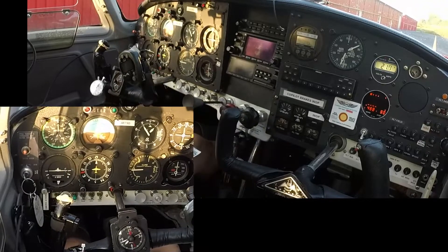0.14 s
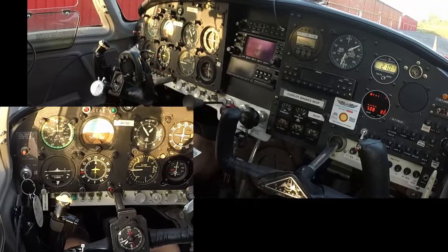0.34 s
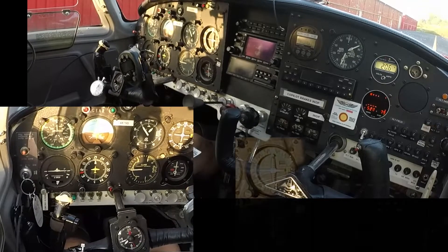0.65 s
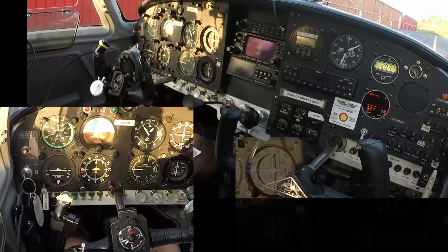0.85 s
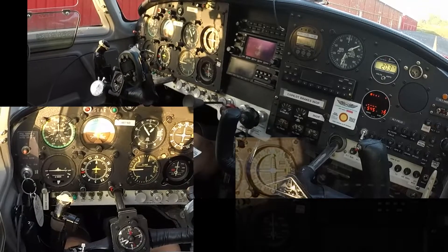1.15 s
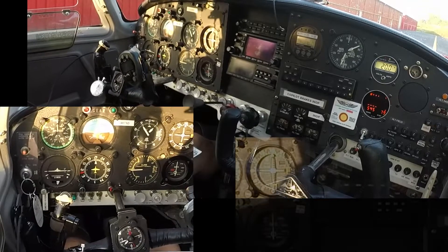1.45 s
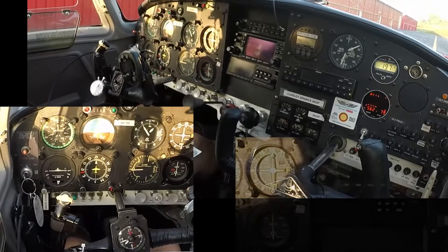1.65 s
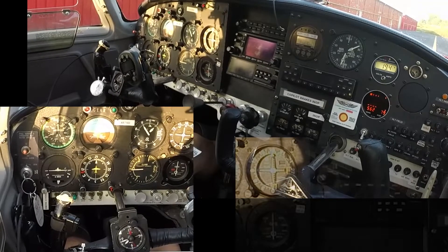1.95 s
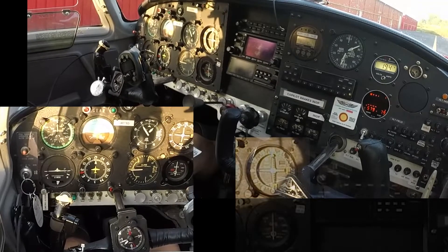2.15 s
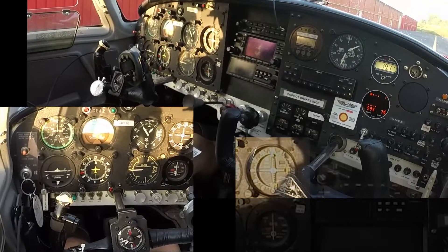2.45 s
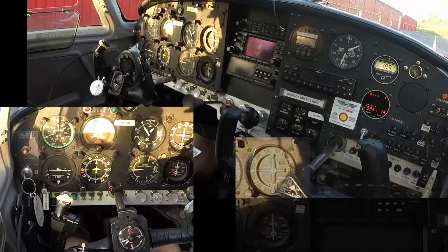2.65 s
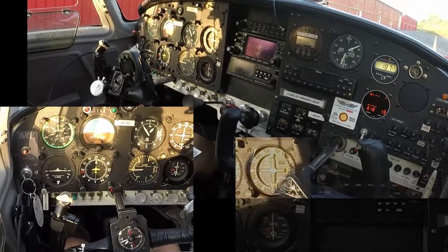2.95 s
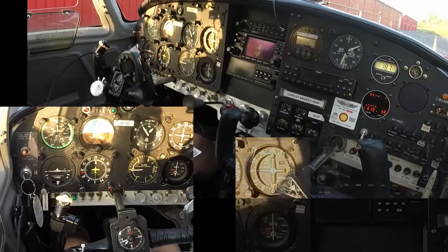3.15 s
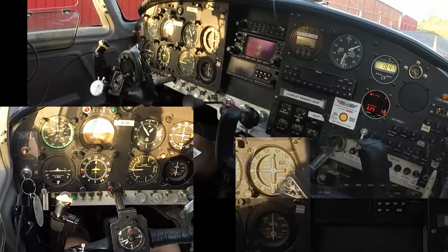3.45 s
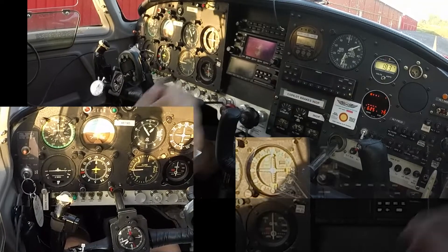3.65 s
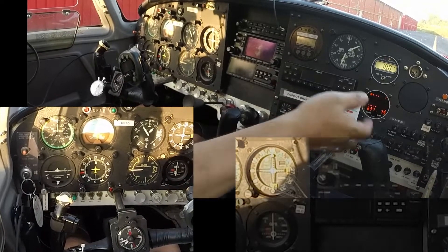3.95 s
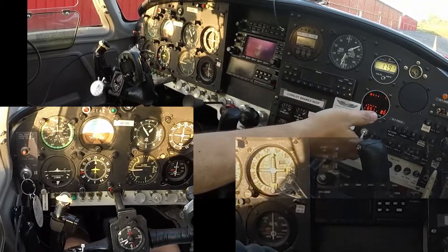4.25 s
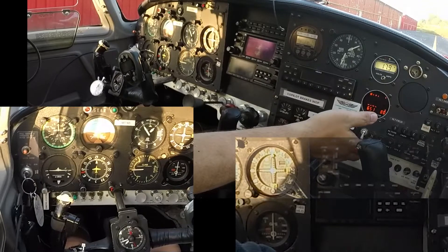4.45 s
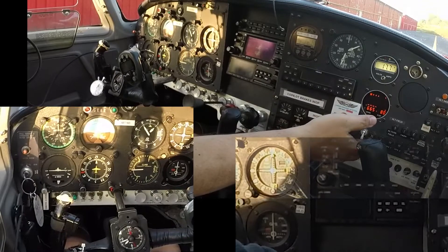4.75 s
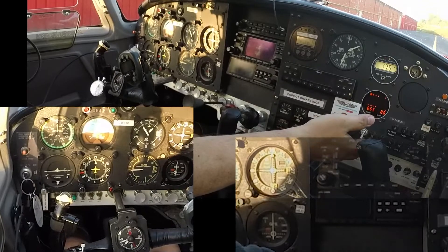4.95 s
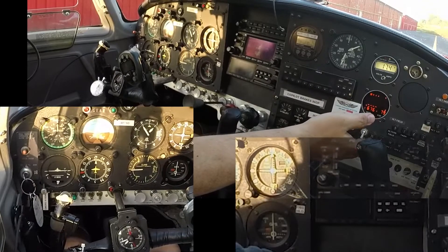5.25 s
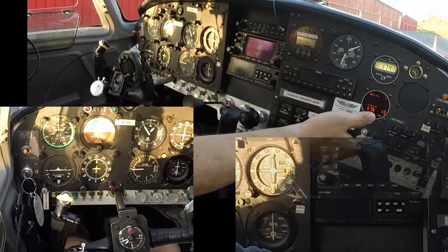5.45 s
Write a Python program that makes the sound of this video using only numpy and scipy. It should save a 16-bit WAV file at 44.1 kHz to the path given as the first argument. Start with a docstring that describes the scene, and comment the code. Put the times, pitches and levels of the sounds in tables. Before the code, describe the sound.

The whole stretch is a four-cylinder aircraft engine idling, heard from inside a closed cockpit. From 0 s a loud, even, bass-heavy throb runs without a break, about 34 pulses a second, strongest from roughly 35 to 100 Hz, with a rough low noise rumble. It rises very slightly in speed over the first second, then holds. Far quieter, muffled valve clatter and a dull panel knock repeat about eight or nine times a second. A soft, gritty propeller wash pulses on top, with hair-thin, wavering high gyro whines almost hidden. Tiny loose-metal ticks fall near 0.6, 1.3, 2.9, 3.5, 4.1 and 5.4 s. The engine and air level dips slightly near 0.8, 2.4, 2.95 and most at 4.1 s, recovering gradually. At about 5.56 s one loud, dry, thin switch pop cuts through without ringing. Mono, close cabin sound, little high end.

```python
"""Closed cockpit of an aircraft: a four-cylinder engine idles near 1030 rpm.
Firing and blade harmonics make the cabin boom over a noise rumble; filtered noise knocks give valve clatter
that repeats every two turns, and one panel knocks once a cycle. Pulsed noise is prop wash on the canopy,
wavering sines are gyro whines, short buzzing rings are loose fittings. A panel switch pops near the end.
The engine and air level dips briefly at times and creeps back."""
import sys
import numpy as np
from scipy import signal
from scipy.fft import rfft, irfft
from scipy.io import wavfile
from scipy.ndimage import uniform_filter1d

SR = 44100
rng = np.random.default_rng(int(sys.argv[2]) if len(sys.argv) > 2 else 0)


def master(y):
    """Save y as 16-bit WAV."""
    cut = np.clip(np.atleast_2d(y).T, -1, 1)
    pcm = np.round(cut * 32767)  # scale
    wavfile.write(sys.argv[1], SR, pcm.astype(np.int16))


N = 246959
T = np.arange(N) / SR

# crankshaft speed: time_s, speed_rpm
CRANK_SPEED = [(0, 1013), (1.15, 1033), (2.2, 1033), (2.5, 1030.5), (5.6, 1028.2)]
# harmonics of the firing and blade rate, first upwards: relative_level_db
FIRING_HARMONICS_DB = [-7.5, -3.5, 0, -24.5, -23.5, -21.5, -21, -38.5, -27.5, -42, -33, -36.5, -35, -39]
# engine lines picked out by panels: order (multiple of cycle rate), relative_level_db
PANEL_LINES = [(68, -35), (73, -38), (74, -35), (82, -37), (104, -44)]
# airframe shudder from uneven burning, spectrum shape: freq_hz, relative_density_db
SHUDDER_SPECTRUM = [(5, -13), (17, 2.5), (36, -2.5), (56, 2), (80, -7.5), (120, -8.5), (170, -9),
                    (215, -11), (270, -21.5), (400, -24), (600, -63)]
# eight valve seatings of one cycle: relative_strength_db
VALVE_STRENGTHS_DB = [-0.42, 1, 0.98, -1.2, 1, -0.73, 0.45, -1.2]
# firewall transmission of valve noise: freq_hz, relative_gain_db
FIREWALL_GAIN = [(150, -16.5), (290, -1), (425, 0), (465, -8), (670, -10.5), (800, -10.5), (1070, -12),
                 (1130, -20), (2000, -26), (5000, -50.5)]
# ringing panels: centre_hz, width_hz, gain_db (on the firewall output, added to it)
PANEL_RESONANCES = [(406, 30, -12), (587, 26, -1.5), (647, 45, -0.5), (896, 22, -5.5), (1034, 25, -3)]
# prop wash on the canopy, spectrum shape: freq_hz, relative_density_db
WASH_SPECTRUM = [(200, 10), (700, 11), (1300, 6), (2000, 0.5), (3100, -0.5), (4000, -5), (5200, -7),
                 (6200, -11), (7300, -10.5), (9500, -14), (12500, -21), (15000, -35)]
# level dips: start_s, depth_db (before attack and recovery shaping), recovery_s
LEVEL_DIPS = [(.77, 1.23, 1.3), (2.38, 0.9, .8), (2.95, 1.04, 1.1), (4.11, 1.7, 1.5), (4.115, 4, 0.027)]
# gyro whines: pitch_hz, level_db (rms, before trim_db)
GYRO_TONES = [(3214, -73), (3994, -81), (4188, -76), (6891, -87.5)]
# loose fittings: start_s, level_db (before trim_db and buzz), ring_hz
FITTING_TICKS = [(0.6094, -48, 4620), (1.3094, -49, 5170), (2.8988, -47, 5430), (3.4894, -55, 4070),
                 (3.5094, -49, 7270), (4.116, -41, 2500), (5.3794, -53, 4190)]
# panel switch: start_s, level_db (before pulse shaping and low cut)
SWITCH_POP = (5.56485, -6)

# layer rms in the cabin, before the level dips
BOOM_DB, SHUDDER_DB, CLATTER_DB, WASH_DB = -16, -27.5, -39.5, -46.5
# shaft imbalance, once a turn, relative to the firing harmonics
SHAFT_DB = -13.5
# weak lines of unequal cylinders: level referred to the firing rate, and slope
UNEVEN_DB, UNEVEN_DB_PER_OCTAVE = -21, -4
START_CYCLE = 0.017
FIRINGS_PER_CYCLE, TURNS_PER_CYCLE = 4, 2
DIP_ATTACK_S = 0.015
TOP_HZ = 15000


def undb(db):
    """Decibels to amplitude gain."""
    return 10 ** (np.asarray(db) / 20)


def unit(x):
    """Scale to rms 1."""
    return x / np.sqrt(np.mean(x ** 2))


def walk(rate_hz):
    """Random levels held 1 / rate_hz, smoothed twice over that span; rms 1."""
    hold = max(int(SR / rate_hz), 1)
    held = rng.standard_normal(N)[np.arange(N) // hold]
    smoothed = uniform_filter1d(held, hold)
    return unit(uniform_filter1d(smoothed, hold))


def colour(x, points):
    """Minimum-phase filter through (freq_hz, gain_db) points, interpolated over log frequency."""
    point_hz, point_db = np.transpose(points)
    size = 2 ** 18
    freq_hz = np.maximum(np.fft.rfftfreq(size, 1 / SR), 1)
    gain_db = np.interp(np.log(freq_hz), np.log(point_hz), point_db)
    # folding the cepstrum makes the filter causal
    cepstrum = irfft(np.log(undb(gain_db)))
    cepstrum[1:size // 2] *= 2
    cepstrum[size // 2 + 1:] = 0
    response = np.exp(rfft(cepstrum))
    return irfft(rfft(x, size) * response)[:N]


def resonate(x, centre_hz, width_hz):
    """One resonance, gain 1 at its centre."""
    b, a = signal.iirpeak(centre_hz, centre_hz / width_hz, fs=SR)
    return signal.lfilter(b, a, x)


def engine_lines(order_limit=32):
    """Rows order, relative_level_db; order is the multiple of the four-stroke cycle rate."""
    firing = [(FIRINGS_PER_CYCLE * (k + 1), db) for k, db in enumerate(FIRING_HARMONICS_DB)]
    between = [k for k in range(5, order_limit) if k % FIRINGS_PER_CYCLE]
    octaves = np.log2(np.array(between) / FIRINGS_PER_CYCLE)
    uneven = zip(between, UNEVEN_DB + UNEVEN_DB_PER_OCTAVE * octaves)
    return [(TURNS_PER_CYCLE, SHAFT_DB), *firing, *uneven, *PANEL_LINES]


def boom(cycle, cabin_hz=86, cabin_width_hz=12, waver_db=0.7, upper_waver_db=1.5,
         jitter_cycles=0.00077, bark_lag_cycles=0.185, smear_rad=1.0):
    """Firing and blade harmonics, with weaker lines between them from unequal cylinders."""
    cycle = cycle + jitter_cycles * walk(17)
    out = 0
    for order, db in engine_lines():
        hz = order * cycle[-1] * SR / N
        deep = order <= 12
        between = order % FIRINGS_PER_CYCLE > 0
        if deep:
            # the cabin air resonance turns over the tones above it
            lag_rad = np.arctan2(hz * cabin_width_hz, cabin_hz ** 2 - hz ** 2)
        else:
            # higher tones join in a later bark
            lag_rad = 2 * np.pi * order * bark_lag_cycles
        # reflections smear the bark; weak lines take so many paths that they form no pulse
        if between:
            spread_rad = np.pi
        else:
            spread_rad = 0 if deep else smear_rad
        lag_rad = lag_rad + spread_rad * rng.standard_normal()
        # deep tones hold steadier than high ones
        depth_db = waver_db if deep else upper_waver_db
        level = undb(db + depth_db * walk(9))
        out = out + level * np.cos(2 * np.pi * order * cycle - lag_rad)
    return unit(out)


def shudder(cycle, throb=0.2, lag_cycles=0.18):
    """No two burns are alike: low noise rumble that swells with each firing."""
    firings = FIRINGS_PER_CYCLE * (cycle - lag_cycles)
    swell = 1 + throb * np.cos(2 * np.pi * firings)
    return unit(colour(swell * rng.standard_normal(N), SHUDDER_SPECTRUM))


def clatter(cycle, ring_s=0.0038, scatter_db=0.7, rattle_gain=1.15, play_cycles=0.003):
    """Eight valves seat in turn; each noise knock is part fixed, part new every cycle."""
    count = len(VALVE_STRENGTHS_DB)
    # many airframe paths make each knock swell before it fades
    age = T[:2048] / ring_s
    envelope = age ** 3 * np.exp(-age)
    out = 0
    for k, db in enumerate(VALVE_STRENGTHS_DB):
        valve_cycle = cycle - k / count + play_cycles * rng.standard_normal()
        beats = np.diff(np.floor(valve_cycle), append=np.nan) > 0
        hits = beats * undb(db + scatter_db * rng.standard_normal(N))
        fixed_knock = envelope * rng.standard_normal(len(envelope))
        own = signal.fftconvolve(hits, fixed_knock)[:N]
        rattle = signal.fftconvolve(hits, envelope)[:N] * rng.standard_normal(N)
        out = out + own + rattle_gain * rattle
    through = colour(out, FIREWALL_GAIN)
    panels = sum(undb(db) * resonate(through, hz, width_hz) for hz, width_hz, db in PANEL_RESONANCES)
    return unit(through + panels)


def knock(cycle, moment_cycles=0.02, ring_hz=635, width_hz=55, peak_db=-39, scatter_db=2.0):
    """One cylinder knocks harder than the rest and rings a panel once a cycle."""
    beats = np.diff(np.floor(cycle - moment_cycles), append=np.nan) > 0
    hits = beats * undb(peak_db + scatter_db * rng.standard_normal(N))
    age_s = T[:4096]
    decay = np.exp(-np.pi * width_hz * age_s) * np.sin(2 * np.pi * ring_hz * age_s)
    # a second resonance: the panel takes a few swings to get going
    ring = resonate(decay, ring_hz, 2 * width_hz)
    return signal.fftconvolve(hits, ring / ring.max())[:N]


def wash(cycle, blade_db=0.55, lope_db=0.5, flutter_db=0.78, grit_db=2.0):
    """Gritty air noise that pulses with each blade and lopes with the engine cycle."""
    blades = np.cos(2 * np.pi * FIRINGS_PER_CYCLE * cycle)
    lope = np.cos(2 * np.pi * cycle) + np.cos(2 * np.pi * TURNS_PER_CYCLE * cycle)
    pulse_db = blade_db * blades + lope_db * lope / 2 + flutter_db * walk(70)
    # random level steps, 16 samples each
    level_grit_db = grit_db * np.repeat(rng.standard_normal(N), 16)[:N]
    noise = undb(pulse_db + level_grit_db) * rng.standard_normal(N)
    return unit(colour(noise, WASH_SPECTRUM))


def dips():
    """Gain that drops quickly at each dip and recovers exponentially."""
    gain_db = 0
    for start_s, depth_db, recovery_s in LEVEL_DIPS:
        age_s = np.maximum(T - start_s, 0)
        onset = 1 - np.exp(-age_s / DIP_ATTACK_S)
        gain_db = gain_db - depth_db * onset * np.exp(-age_s / recovery_s)
    return undb(gain_db)


def switch(rise_s=0.000075, fall_s=0.00038, low_cut_hz=80):
    """The contact closes: one short, thin pop with a steep front and no ring."""
    start_s, level_db = SWITCH_POP
    age_s = np.maximum(T - start_s, 0)
    front = 1 - np.exp(-(age_s / rise_s) ** 2)
    pop = undb(level_db) * front * np.exp(-(age_s / fall_s) ** 2)
    b, a = signal.butter(1, low_cut_hz, "high", fs=SR)
    return signal.lfilter(b, a, pop)


def ticks(ring_s=0.0087, trim_db=-7.5, buzz=0.58):
    """Small metal parts touch: decaying sines with a random amplitude buzz."""
    out = 0
    for start_s, level_db, ring_hz in FITTING_TICKS:
        age_s = np.maximum(T - start_s, 0)
        ring = np.sin(2 * np.pi * ring_hz * age_s) * (1 + buzz * walk(1500))
        out = out + undb(level_db + trim_db) * np.exp(-age_s / ring_s) * ring
    return out


def gyros(waver_db=2.0, drift_hz=9, trim_db=-1):
    """Spinning instruments: thin sines, unsteady in pitch and level."""
    out = 0
    for pitch_hz, level_db in GYRO_TONES:
        turns = np.cumsum(pitch_hz + drift_hz * walk(20)) / SR
        level = undb(level_db + trim_db + waver_db * walk(12))
        out = out + level * np.sqrt(2) * np.sin(2 * np.pi * turns)
    return out


def scene():
    """The crankshaft drives every engine layer; one four-stroke cycle takes two turns."""
    speed_rpm = np.interp(T, *np.transpose(CRANK_SPEED))
    cycle = START_CYCLE + np.cumsum(speed_rpm) / (TURNS_PER_CYCLE * 60 * SR)
    exhaust = undb(BOOM_DB) * boom(cycle) + undb(SHUDDER_DB) * shudder(cycle)
    metal = undb(CLATTER_DB) * clatter(cycle) + knock(cycle)
    air = undb(WASH_DB) * wash(cycle)
    cabin = dips() * (exhaust + metal + air)
    return (cabin + switch() + ticks() + gyros())[None]


def record(dry):
    """Steep elliptic low-pass at TOP_HZ."""
    low_pass = signal.ellip(8, 0.2, 70, TOP_HZ, fs=SR, output="sos")
    return signal.sosfilt(low_pass, dry)


dry = scene()
out = record(dry)
master(out)
```